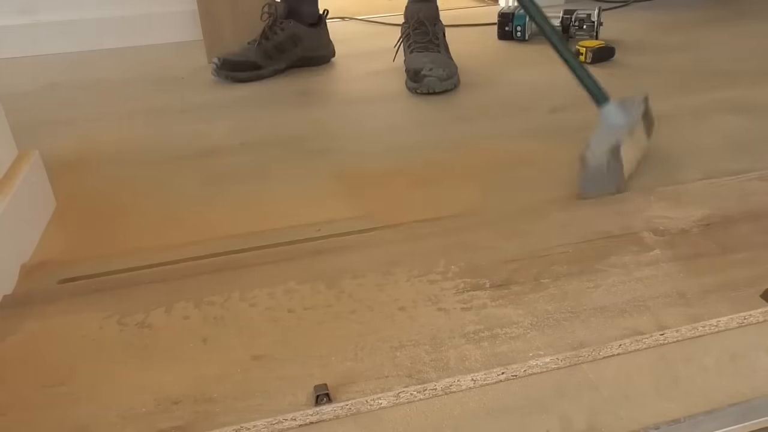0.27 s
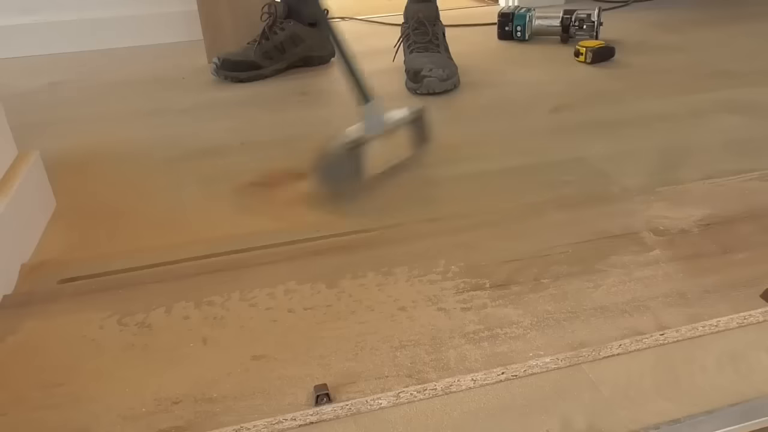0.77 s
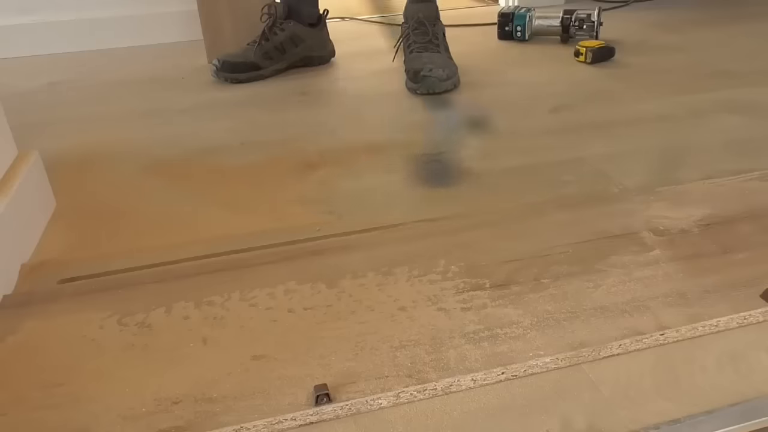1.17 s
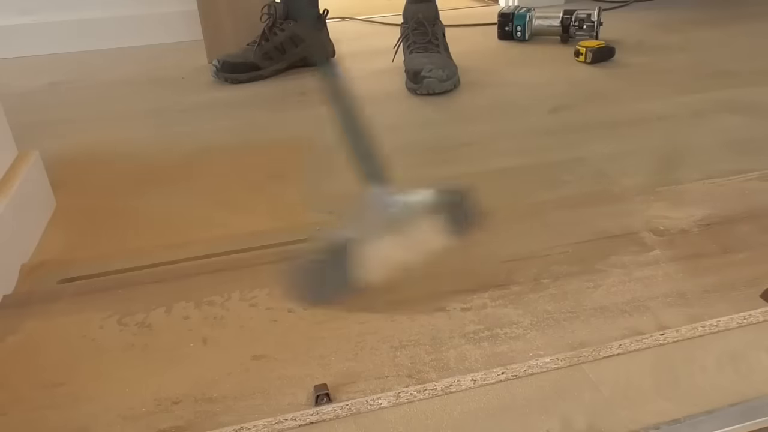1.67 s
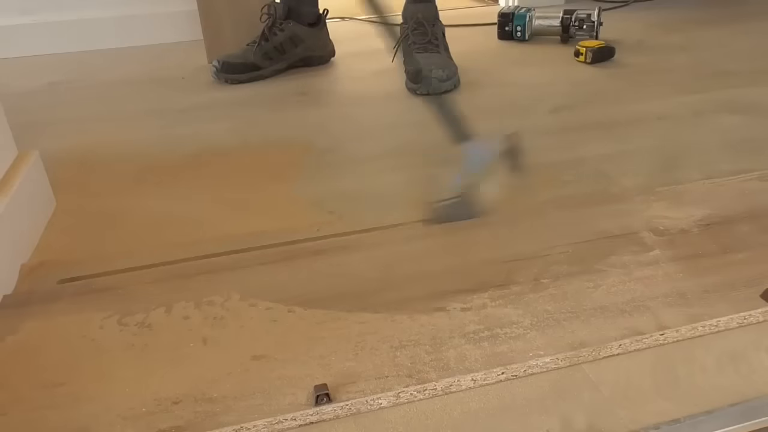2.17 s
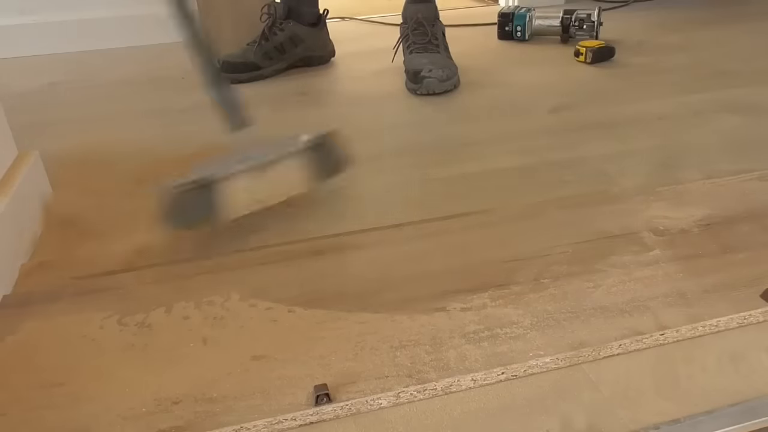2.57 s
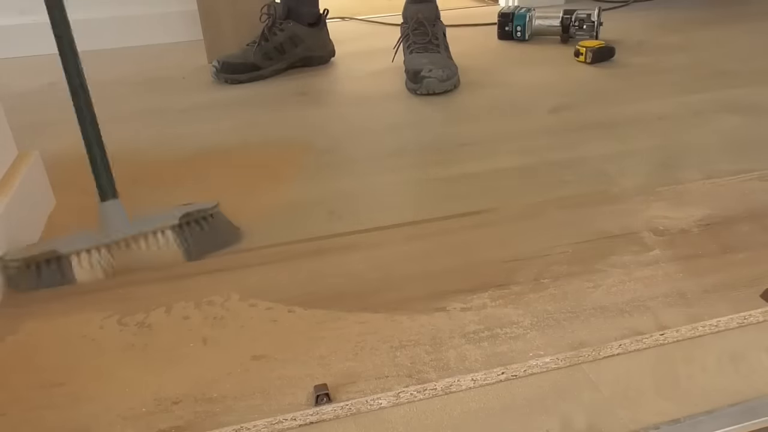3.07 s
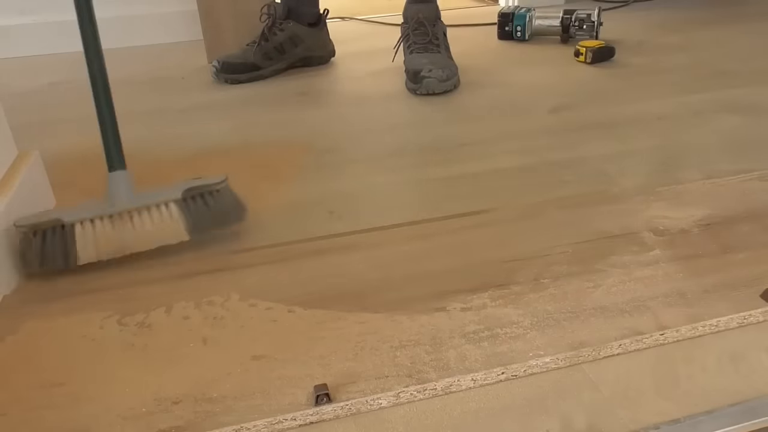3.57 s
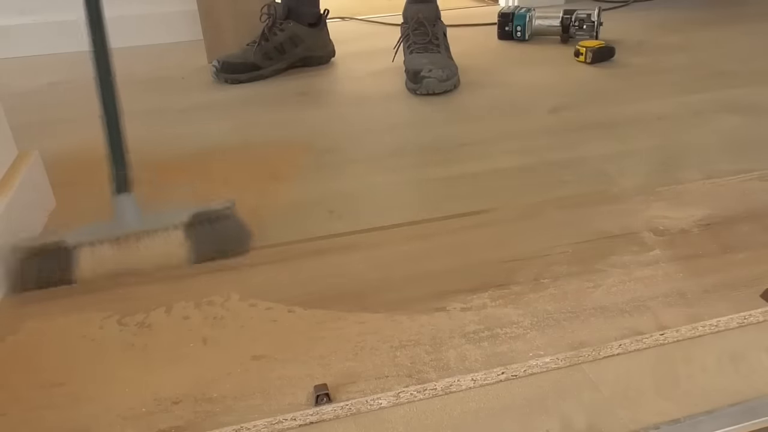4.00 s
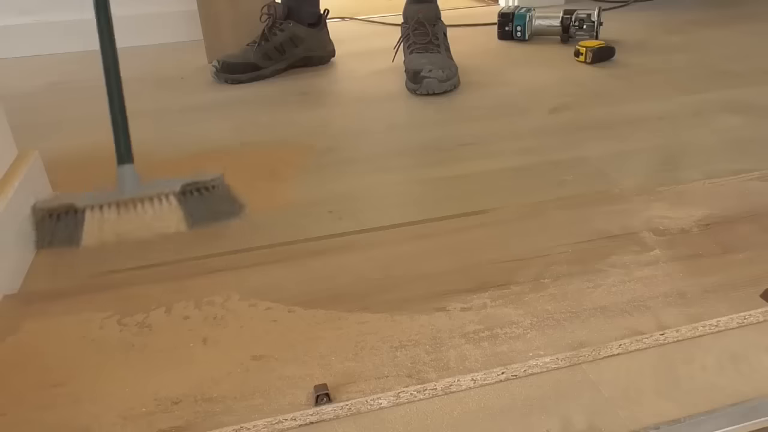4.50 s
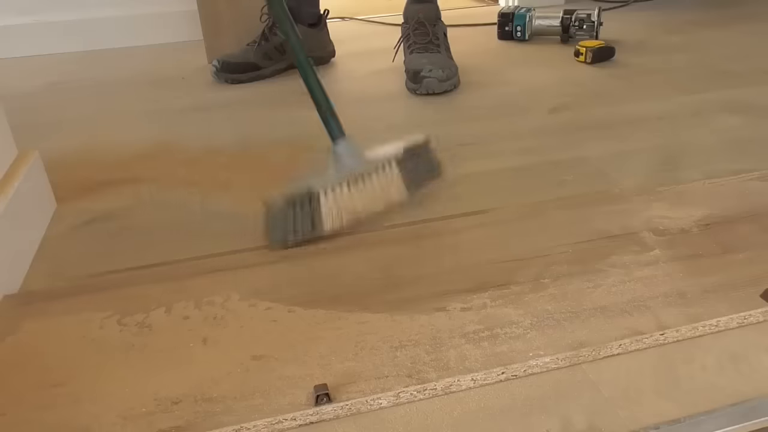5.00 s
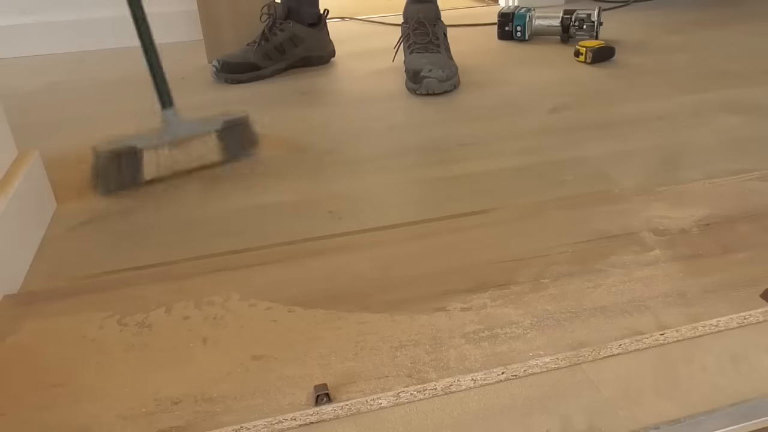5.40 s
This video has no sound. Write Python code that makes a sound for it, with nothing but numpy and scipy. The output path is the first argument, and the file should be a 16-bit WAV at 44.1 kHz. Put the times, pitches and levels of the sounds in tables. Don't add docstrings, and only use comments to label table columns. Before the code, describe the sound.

Close bristle strokes slap and rasp across hard boards, five sharp broom-head knocks against hollow skirting echo in the room, then sweeping resumes.

```python
import sys
import numpy as np
from scipy import signal
from scipy.io import wavfile
from scipy.ndimage import uniform_filter1d

SR = 44100
rng = np.random.default_rng(int(sys.argv[2]) if len(sys.argv) > 2 else 0)


def level_to_linear(level):
    exponent = np.asarray(level, float) / 20
    return 10 ** exponent


def store_pcm(level_fs):
    pcm = np.round(np.clip(level_fs, -1, 1) * 32767).astype(np.int16)
    wavfile.write(sys.argv[1], SR, np.atleast_2d(pcm).T)


N = 249165
STEP = 16

KNOCK_TIMES = np.array([3.1499, 3.4746, 3.8171, 4.1567, 4.473])


def at_hz(table, hz):
    f, v = np.transpose(table)
    return np.interp(np.log(hz), np.log(f), v)


def set_rms(x, db):
    return x * level_to_linear(db) / np.sqrt(np.mean(x ** 2))


def band(x, hz, octaves):
    edges = hz * 2. ** np.array([-octaves / 2, octaves / 2])
    edges = np.minimum(edges, [.43 * SR, .48 * SR])
    return signal.sosfilt(signal.butter(2, edges, "band", fs=SR, output="sos"), x)


def cut_bass(x, hz):
    return signal.sosfilt(signal.butter(3, hz, "high", fs=SR, output="sos"), x)


def pair(mid, side, hz):
    # (frequency [Hz], level [dB])
    stereo_width = [(60, -7), (110, -15), (200, -6), (380, -12.5), (700, -6), (1290, -5), (2380, -6.5),
                    (4400, -4.5), (8120, 0), (15000, -1.5)]
    return mid + level_to_linear(at_hz(stereo_width, hz)) * side * np.array([[1], [-1]])


def walk(rate):
    hold = int(SR / STEP / rate)
    steps = np.repeat(rng.standard_normal(N // STEP // hold + 2), hold)
    smooth = uniform_filter1d(uniform_filter1d(steps, hold), hold)
    return 1.27 * smooth[:N // STEP + 1]


def ring(modes, seconds):
    t = np.arange(int(seconds * SR)) / SR
    return sum(level_to_linear(db - 60 * t / t60) * np.sin(2 * np.pi * hz * t) for hz, db, t60 in modes)


def add(out, s, x, pan_db):
    i = int(s * SR)
    panned = x * level_to_linear(np.array([[pan_db], [-pan_db]]) / 2)
    out[:, i:i + x.shape[-1]] += panned[:, :out.shape[1] - i]


def place(s):
    # (time [s], left minus right [dB])
    head_path = [(0, -0.5), (1.3, -0.5), (2.8, -0.5), (3.4, 0.7), (4.6, 0.3), (5.1, 0.2)]
    return np.interp(s, *np.transpose(head_path))


def contact(gain):
    # (landing [s], lift [s], landing level [dB], first hiss [dB], hiss at lift [dB])
    strokes = [(-.08, 0.14, -40.5, -46.5, -53), (0.194, 0.211, -55, -72, -63),
               (0.282, 0.3, -53.5, -72, -71), (0.421, 0.78, -32.5, -51.5, -52.5),
               (0.465, .52, -38, -54, -54), (0.91, 1.07, -93, -78, -82), (1.114, 1.359, -31.5, -49, -49.5),
               (1.691, 1.846, -40, -46.5, -42.5), (2.182, 2.457, -30, -52, -46.5),
               (2.45, 2.505, -72, -50, -43), (2.607, 2.824, -69, -76, -62.5),
               (2.821, 3.158, -31.5, -48.5, -39.5), (3.43, 3.475, -35.5, -54.5, -55),
               (3.542, 3.59, -62, -73, -67), (3.741, 3.817, -37.5, -47, -54),
               (3.843, 3.87, -56, -66, -56.5), (4.117, 4.157, -37.5, -60, -48.5),
               (4.214, 4.266, -64, -81, -64), (4.482, 4.755, -42, -61.5, -49.5),
               (5.112, 5.436, -32.5, -50, -49)]
    # (board rumble, head rasp, tip hiss)
    # shock of landing [dB] and its quick fade [dB/s]
    landing_db = [0.5, -3, -14]
    landing_fade = [146.5, 198, 350.5]
    shudder_db = [-6.5, -7.5, -26]
    shudder_fade = [69.5, 62.5, 59]
    drag_db = [-54.5, -53, -50.5]
    drag_share = [0.43, 0.7, 0.9]
    lift_fade = [139, 162, 201]
    # level [dB], fade [dB/s]
    after_db = [-5, -4, -5]
    after_fade = [57, 66, 95]
    skirting_db = [6, 2.3, -0.1]
    scuff_db = [-42.5, -59.5, -70.5]
    scuff_duck = [1.06, 0.3, 0.19]
    attack_s, stop_s, tip_bend_s = 0.0042, 0.003, 0.076
    tip_landing_hz, tip_sweep_hz, tip_after_hz = 7770, 9670, 8500

    def col(v):
        return np.array(v)[:, None]

    t = np.arange(0, N, STEP) / SR
    between = (t > KNOCK_TIMES[0]) & (t < KNOCK_TIMES[-1])
    power = between * (level_to_linear(col(scuff_db)) * gain[::STEP] ** col(scuff_duck)) ** 2 + 1e-14
    tip_hz = np.full(len(t), float(tip_after_hz))
    for land, lift, shock_db, first_db, last_db in strokes:
        since, gone = np.maximum(t - land, 0), np.maximum(t - lift, 0)
        hiss_db = np.interp(t, [land, lift], [first_db, last_db])
        drag = col(drag_db) + col(drag_share) * (hiss_db + 50)
        parts = [shock_db + col(landing_db) - col(landing_fade) * since,
                 shock_db + col(shudder_db) - col(shudder_fade) * since,
                 drag - col(lift_fade) * gone,
                 drag + col(after_db) - col(after_fade) * gone]
        stop = min([k for k in KNOCK_TIMES if k > land], default=99)
        gate = np.clip(np.minimum(since / attack_s, 1 - (t - stop) / stop_s), 0, 1)
        near = level_to_linear(col(skirting_db) * (KNOCK_TIMES[0] < land < KNOCK_TIMES[-1]))
        power = power + sum(level_to_linear(p) ** 2 for p in parts) * (gate * near) ** 2
        bend = tip_sweep_hz + (tip_landing_hz - tip_sweep_hz) * np.exp(-(since / tip_bend_s) ** 2)
        relaxed = bend + (tip_after_hz - bend) * (1 - np.exp(-gone / tip_bend_s))
        tip_hz = np.where(t > land, relaxed, tip_hz)
    board_db, head_db, tip_db = 10 * np.log10(power)
    return board_db, head_db, tip_db, tip_hz


def brush(gain, bump_db=5, bump_octaves=0.25, scatter_db=2.0, judder_db=0.5, flicker_db=0.7):
    # (frequency [Hz], density [dB per Hz])
    brush_colour = [(35, -54.5), (60, -31), (133, -4.5), (238, -9), (274, -0.5), (437, 0), (540, -7.5),
                    (682, 1), (991, -7.5), (1310, 1), (1820, -21), (3850, -12.5), (6000, -20.5),
                    (10000, -20.5), (16000, -28.5)]
    board_hz = 470
    whistle_db_per_db = 0.25
    board_db, head_db, tip_db, tip_hz = contact(gain)
    slips = rng.standard_normal((2, N)) * level_to_linear(scatter_db * rng.exponential(size=(2, N)))
    slips = slips / slips.std()
    thirds = 59 * 2 ** (np.arange(25) / 3)
    power = 10 ** (at_hz(brush_colour, thirds) / 10) * thirds
    part = np.digitize(thirds, [1800, 5700])
    out, judder = 0, walk(39.4)
    for hz, p, k in zip(thirds, power, part):
        centre = board_hz if hz < 2000 else tip_hz
        sharp = bump_db + (hz > 2000) * whistle_db_per_db * np.clip(tip_db + 47, -9, 14)
        bump = sharp * np.exp(-(np.log2(hz / centre) / bump_octaves) ** 2)
        db = (board_db, head_db, tip_db)[k] + bump - 2 + judder_db * judder + flicker_db * walk(30)
        share = p / power[part == k].sum()
        mid, side = band(slips, hz, 1 / 3) * np.sqrt(SR / (0.63 * hz) * share)
        out = np.repeat(level_to_linear(db), STEP)[:N] * pair(mid, side, hz) - out
    pan_db = place(np.arange(N) / SR)
    return out * level_to_linear(np.array([pan_db, -pan_db]) / 2)


def rings(width_hz=30, width_share=.11):
    # (time [s], frequency [Hz], rms level [dB], t60 [s], length [s])
    resonances = [(0, 495, -56, 0.88, 0.82), (.426, 800, -37, 0.64, 0.27), (.426, 2070, -45, 0.33, .3),
                  (.55, 459, -47, 0.59, 0.44), (1.115, 353, -35.5, 0.82, 0.65),
                  (1.115, 3300, -40, 0.93, 0.64), (1.115, 150, -42, 0.21, .15),
                  (1.697, 283, -40.5, 0.68, 0.57), (1.697, 1280, -39, 0.34, 0.18),
                  (1.695, 716, -35, 0.16, 0.12), (2.185, 774, -28, 0.26, 0.25), (2.185, 1080, -45, 0.8, .2),
                  (2.299, 331, -49.5, 1.5, 0.52), (2.36, 692, -47, 1.9, 0.15), (2.56, 808, -53.5, 10, 0.41),
                  (2.58, 1203, -58.5, 9., 0.26), (2.62, 2390, -63, 9., 0.31),
                  (2.826, 1490, -46.5, 2.1, 0.29), (2.826, 2060, -45, 0.54, 0.25),
                  (2.826, 150, -43, 0.45, 0.45), (4.124, 3830, -39, .12, 0.04),
                  (4.811, 312, -48, 2.2, 0.335), (5.115, 3700, -46.5, 0.95, 0.37),
                  (5.115, 446, -38, 0.69, 0.24)]
    out = np.zeros((2, N))
    for s, hz, db, t60, length in resonances:
        t = np.arange(int(length * SR)) / SR
        noise = rng.standard_normal((2, SR))[:, :len(t) + 4000]
        mid, side = band(noise, hz, 0.97 * (width_hz / hz + width_share))[:, 4000:]
        fade = np.minimum(t / 0.00047, 1) * np.minimum((length - t) / 0.026, 1)
        add(out, s, set_rms(pair(mid, side, hz), db) * level_to_linear(-60 * t / t60) * fade, 0)
    return out


def slaps(spray_s=0.0048, board_t60=0.061, rise_s=0.00051, spray_hz=3520):
    # (time [s], peak level [dB], board level relative [dB], board frequency [Hz])
    tuft_slaps = [(0.3, -33, -10, 507), (0.4231, -13.5, -17, 590), (0.4332, -24, 13, 500),
                  (0.4487, -32, 12, 477), (1.1125, -10, -3, 580), (1.1192, -36, -3, 348),
                  (1.695, -6, -7.5, 296), (2.1812, -18, -5, 845), (2.2, -15.5, 4.5, 568),
                  (2.2274, -18.5, -10, 745), (2.8267, -8.5, -14, 553), (2.8422, -18.5, 0, 310),
                  (3.4319, -28, 22, 289), (3.7451, -17, -14, 289), (3.762, -12.5, 1.5, 515),
                  (3.855, -36, 21, 330), (4.117, -26.5, 12.5, 464), (4.4894, -24, 13, 340),
                  (4.511, -37, 26, 314), (4.569, -29.5, 18, 303), (5.1116, -19, -16, 455),
                  (5.1264, -16.5, -0.5, 310)]
    out, t = np.zeros((2, N)), np.arange(3000) / SR
    tufts = 1 - np.exp(-t / rise_s)
    for s, db, board_db, hz in tuft_slaps:
        noise = band(rng.standard_normal((2, len(t))), spray_hz, 2.01)
        spray = pair(*noise, spray_hz) * np.exp(-t / spray_s)
        modes = [(hz, 0, board_t60), (1.26 * hz, -5, board_t60 / 2), (3.95 * hz, -9, board_t60 / 2)]
        thud = cut_bass(ring(modes, len(t) / SR) * tufts, 210)
        add(out, s, level_to_linear(db - 10.5) * spray * tufts + level_to_linear(db + board_db - 9) * thud, place(s))
    return out


def grit(tick_s=0.0057):
    # (time [s], peak level [dB], frequency [Hz])
    grains = [(.964, -46.5, 9000), (1.025, -50, 8000), (1.056, -49.5, 5000), (1.553, -45.5, 5000)]
    out, t = np.zeros((2, N)), np.arange(800) / SR
    for s, db, hz in grains:
        noise = band(rng.standard_normal((2, len(t))), hz, 1.95)
        add(out, s, level_to_linear(db) * pair(*noise, hz) * np.exp(-t / tick_s), place(s))
    return out


def knocks(crack_s=0.0008, fresh=0.67, tick_db=-8, aside=0.38):
    # (peak level [dB], crack relative [dB], boom relative [dB], pitch factor [1])
    blows = [
        (-3, -9.5, -19.5, 0.99),
        (-4, -25, -20.5, 1.006),
        (-4.5, -23.5, -20.5, 0.96),
        (-3, -15.5, -20, 1.02),
        (-4, -28, -20.5, 0.99),
    ]
    # (frequency [Hz], level [dB], t60 [s])
    skirting_modes = [(456, 9.5, 0.015), (316, 1.5, 0.21), (357, -19.5, 0.054), (800, 7.5, 0.0065),
                      (1080, -9, 0.032), (1270, -43.5, 0.033), (2140, -9.5, 0.0098), (3300, -44, .008)]
    # (delay [s], level [dB])
    wall_echoes = [(.009, -3), (.027, -0.5), (.038, 0), (.075, -10.5), (.097, -9)]
    knock_pan_db, boom_pan_db = 1.4, -.5
    thump_hz, thump_db, thump_t60 = 86.6, -27, .12
    out, shared, other = np.zeros((2, N)), room(), room()
    push = np.hanning(10) / 5
    for s, (db, crack_db, boom_db, pitch) in zip(KNOCK_TIMES, blows):
        modes = [(pitch * hz, d, t60) for hz, d, t60 in skirting_modes]
        wood = np.convolve(cut_bass(ring(modes, .15), 310), push)
        noise = band(rng.standard_normal((2, 600)), 3800, 2.4)
        crack = pair(*noise, 1000) * np.exp(-np.arange(600) / SR / crack_s)
        add(out, s, level_to_linear(db + crack_db) * crack, knock_pan_db)
        recoil = cut_bass(np.pad(np.hanning(26), (0, 999)), 240)
        add(out, s - .0005, -level_to_linear(db + tick_db) * recoil, knock_pan_db)
        upper = aside * band(wood, 980, 4.7) * np.array([[1], [-1]])
        add(out, s, level_to_linear(db - 5) * (wood + upper), knock_pan_db)
        add(out, s, level_to_linear(db + boom_db) * shared, boom_pan_db)
        add(out, s + 0.016 * rng.random(), level_to_linear(db + boom_db) * fresh * other, 0)
        thump = cut_bass(ring([(thump_hz, 0, thump_t60)], .2), 45)
        add(out, s, level_to_linear(db + thump_db) * thump, knock_pan_db)
        for delay, echo_db in wall_echoes:
            add(out, s + delay, level_to_linear(db + echo_db) * band(wood, 361, .85), 0)
    return out


def room(seconds=1.3, rise_s=0.028, modes_db=-1, wander=0.0082, flutter_db=1.0):
    # (frequency [Hz], density [dB per Hz])
    boom_colour = [(47, -58), (80, -18.5), (118, -32), (147, -13), (173, -18.5), (240, -6.5), (269, -8),
                   (306, -0.5), (454, -6), (599, -16.5), (1080, -19.5), (1760, -42.5), (2080, -36),
                   (2750, -51.5), (4000, -47.5), (5200, -68), (8800, -120)]
    # (frequency [Hz], t60 [s])
    decay_times = [(60, 0.54), (300, 0.61), (1000, 0.63), (3000, 0.94), (8000, 0.66)]
    # (frequency [Hz], level [dB], t60 [s])
    standing_modes = [(150, -18.5, 0.693), (277.8, -4, 0.73), (312, 4, 0.67), (404, -5.5, 0.8),
                      (468.6, -5.5, 0.56), (514, -22.5, 0.43), (603, -18.5, 0.82), (793, -8, 0.44),
                      (1097, -24, 0.88)]
    t = np.arange(int(seconds * SR)) / SR
    diffuse = 0
    for hz in 80 * 2 ** (np.arange(36) / 6):
        mid, side = band(rng.standard_normal((2, len(t))), hz, 1 / 6)
        fade = level_to_linear(at_hz(boom_colour, hz) - 60 * t / at_hz(decay_times, hz))
        diffuse = diffuse + fade * pair(mid, side, hz)

    def drift(rate):
        return np.interp(t, np.arange(N // STEP + 1) * STEP / SR, walk(rate))

    phases = rng.uniform(0, 2 * np.pi, len(standing_modes))
    standing = 0
    for (hz, db, t60), phase in zip(standing_modes, phases):
        strength = level_to_linear(db - 60 * t / t60 + flutter_db * drift(22))
        turns = hz * np.cumsum(1 + wander * drift(13.56)) / SR
        standing = standing + strength * np.sin(2 * np.pi * turns + phase)
    return (set_rms(diffuse, 0) + set_rms(standing, modes_db)) * (1 - np.exp(-t / rise_s))


def quiet(quiet_db=-51.5):
    # (frequency [Hz], density [dB per Hz])
    house_colour = [(15, -33), (25, -3), (170, -6.5), (223, -6), (363, -13.5), (1020, -14), (1560, -10),
                    (1940, -24.5), (3720, -22), (4030, -8.5), (5280, -21.5), (10100, -19.5), (16000, -42.5)]
    out = 0
    for hz in 30 * 2 ** np.arange(0, 9.2, .5):
        noise = band(rng.standard_normal((2, N)), hz, 0.57)
        out = out + level_to_linear(at_hz(house_colour, hz)) * pair(*noise, hz)
    return set_rms(out, quiet_db - 10.5)


def limiter(hold_s=0.003, fall_s=0.019, duck_db=22.5, duck_s=0.17):
    since = np.maximum(np.arange(N) / SR - np.array(KNOCK_TIMES)[:, None] - hold_s, 0)
    dip_db = duck_db * (1 - np.exp(-since / fall_s)) * np.exp(-(since / duck_s) ** 1.48)
    return level_to_linear(-np.max(dip_db, axis=0))


def hush(ahead_s=0.012):
    # (landing time [s], gain [dB])
    dips = [
        (1.109, -15),
        (1.693, -2.5),
        (2.181, -2),
    ]
    t = np.arange(N) / SR
    return level_to_linear(sum(db * np.clip(np.minimum((t - s + ahead_s) / .002, (s - t) / .001), 0, 1)
                   for s, db in dips))


def scene():
    gain = limiter()
    sweeping = brush(gain) + rings() + slaps() + grit()
    return hush() * (sweeping + gain * knocks() + gain ** 0.35 * quiet())


def band_limit(x):
    return signal.sosfilt(signal.butter(12, 16470, fs=SR, output="sos"), x)


def record(dry):
    rounded = np.tanh(1.147 * dry) / 1.508
    top_cut = signal.ellip(6, .2, 60, 15400, fs=SR, output="sos")
    return band_limit(signal.sosfilt(top_cut, rounded))


dry = scene()
out = record(dry)
store_pcm(out)
```